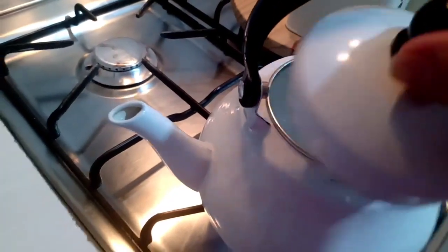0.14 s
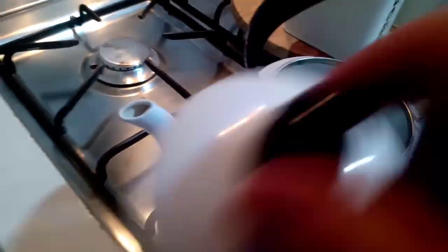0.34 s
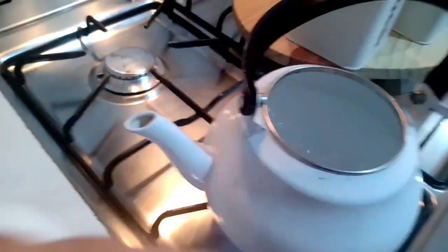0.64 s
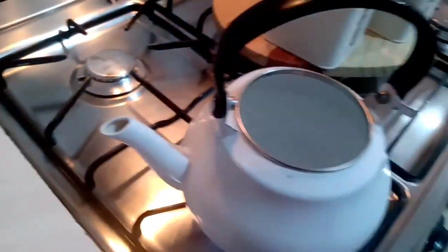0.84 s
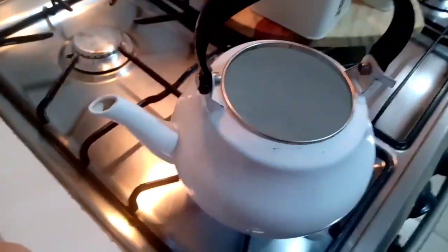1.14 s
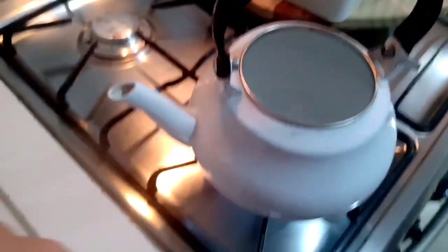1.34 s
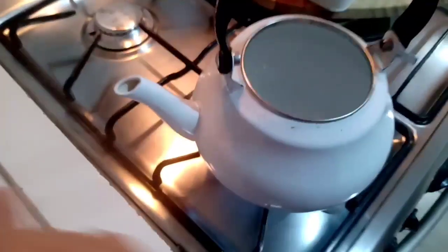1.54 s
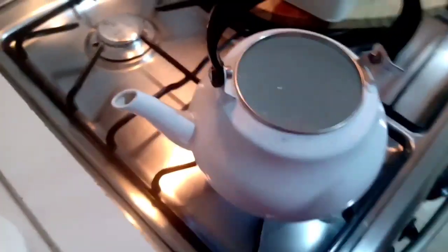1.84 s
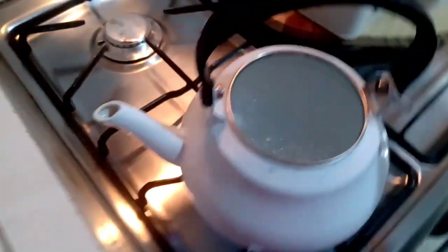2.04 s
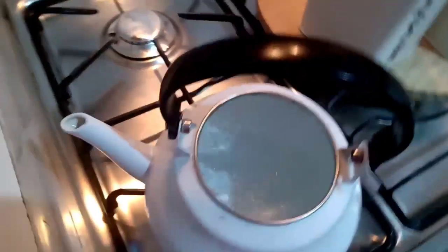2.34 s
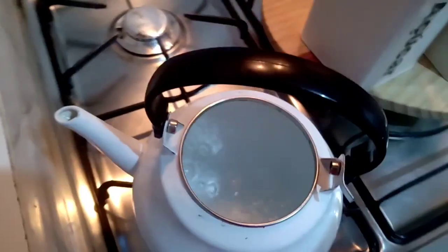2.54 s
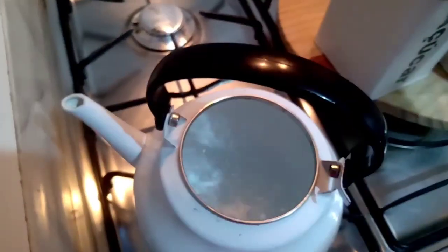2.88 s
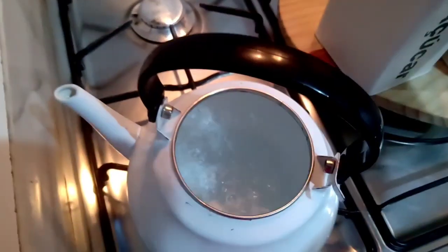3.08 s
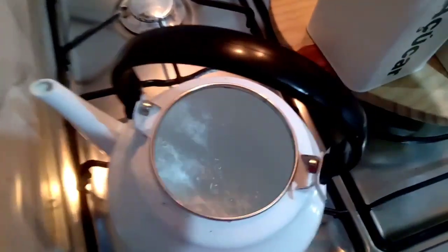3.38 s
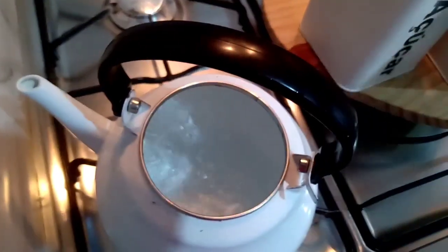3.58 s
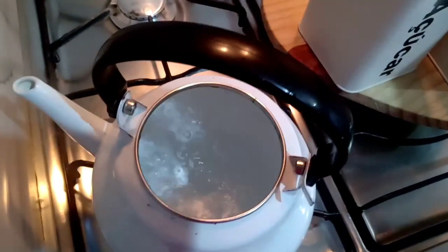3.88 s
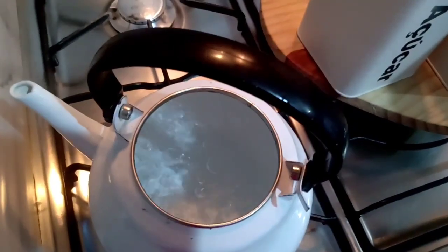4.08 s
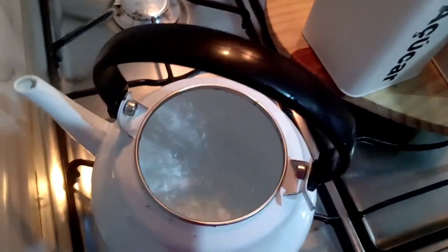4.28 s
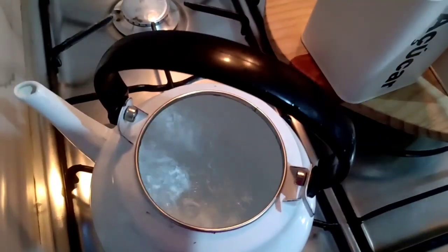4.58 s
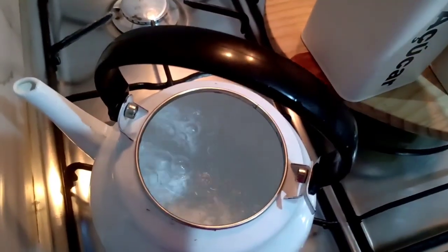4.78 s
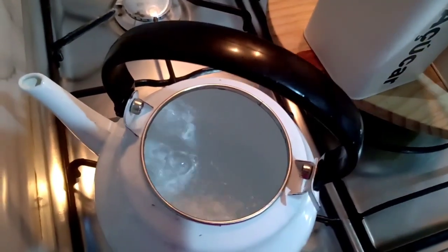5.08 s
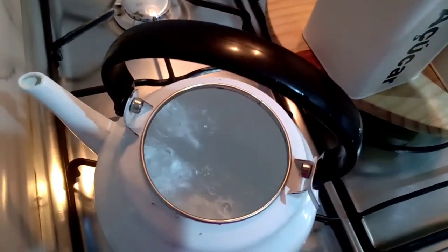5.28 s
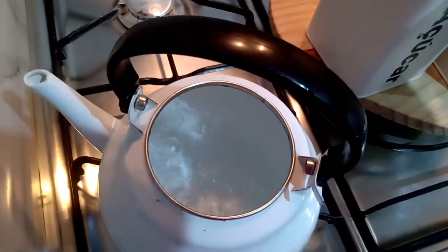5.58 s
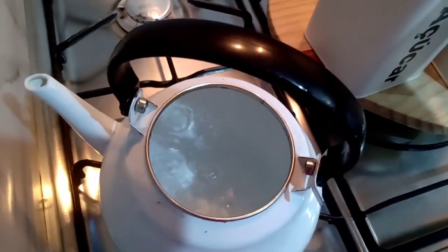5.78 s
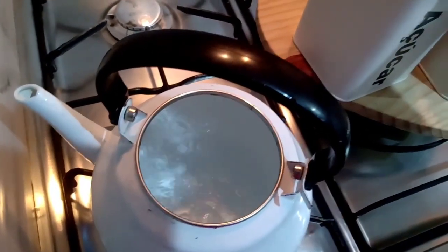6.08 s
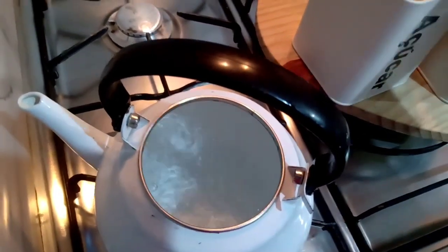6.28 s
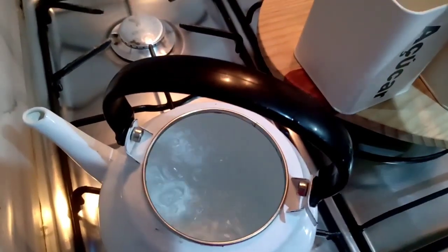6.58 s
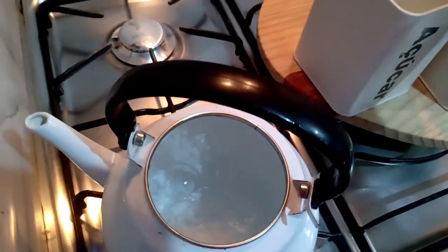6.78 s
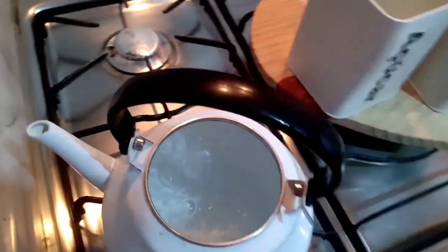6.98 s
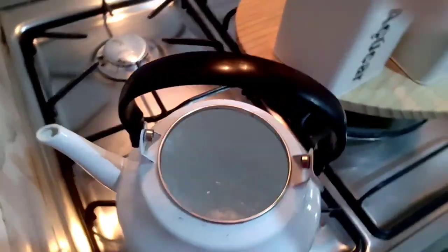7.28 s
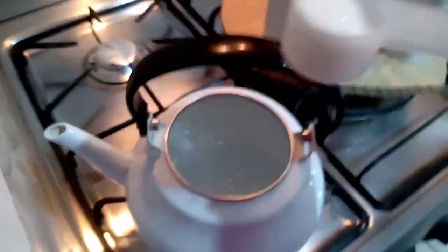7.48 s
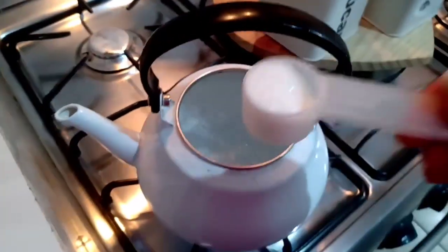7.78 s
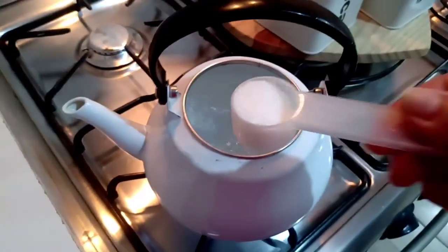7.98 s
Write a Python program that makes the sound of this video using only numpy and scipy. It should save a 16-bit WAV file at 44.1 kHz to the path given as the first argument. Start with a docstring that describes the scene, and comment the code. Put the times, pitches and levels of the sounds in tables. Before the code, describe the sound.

A small kitchen heard close up in stereo, with short room reverberation. Throughout, an open enamel kettle simmers on a gas hob: gently fluctuating low rumble, bright metallic-tinged hiss, tiny fizzing ticks and irregular hollow bubble pops. At about 1.0 s the lid touches the worktop on the right, chatters, then clinks hardest at 1.13 s with a glassy enamel click; it scrapes on its rim, with a wavering squeal around 1.3 s, and settles by 1.5 s. Simmering alone follows. Dull wooden knocks come at 2.6 s and 3.3 s, then at 4.1 s and more strongly at 4.25 s, followed by small crockery clinks at 4.3 to 4.4 s with brushing. A plastic tub clacks at 4.85 s and much louder at 5.1 s, with small aftertaps and a low cupboard boom near 5.5 s. Simmering and pops continue, with a faint swish at 7.4 s, until about 8 s.

```python
"""A small kitchen: an open enamel kettle simmers on a gas hob, close by (shaped noise, ticks, ringing pops).
Its lid is put down on the worktop to the right: it clinks, scrapes on its rim and squeals briefly,
by struck modes, stick-slip pulses through drifting resonances, and wavering tones.
Then things are fetched beside the hob: dull wooden knocks, a small clink and two sharp clacks (struck modes),
with brushing, a low cupboard boom and a faint swish made of swelling bands of noise."""
import sys
import numpy as np
from scipy import signal
from scipy.fft import rfft, irfft, next_fast_len
from scipy.io import wavfile
from scipy.ndimage import uniform_filter1d

SR = 44100
rng = np.random.default_rng(int(sys.argv[2]) if len(sys.argv) > 2 else 0)


def materialize(psi):
    """Save the field psi as 16-bit PCM at rate SR to the path in sys.argv[1].

    A 1-D psi becomes a single channel; in a 2-D psi each row is a channel.
    """
    bounded = np.clip(np.atleast_2d(psi).T, -1, 1)
    quanta = np.round(bounded * 32767).astype(np.int16)
    wavfile.write(sys.argv[1], SR, quanta)


N = 358533
TIME = np.arange(N) / SR  # s
RING = TIME[:SR // 2]  # time axis of one struck sound, s

# All levels are relative: later gains set the final balance. t60 is the time to decay by 60 dB.
# spectrum of burner and simmering water: (f/Hz, density/dB per Hz)
SIMMER_SPECTRUM = [(25, -16), (55, -45), (90, 8), (125, 4.5), (160, -4), (310, 7), (440, 4), (550, -4.5),
                   (810, 7), (1080, -7), (4000, -9.5), (10800, -11), (12200, -16.5), (15000, -21)]
# kettle resonances that colour the simmer: (f/Hz, width/Hz, left level/dB, right level/dB)
KETTLE_RESONANCES = [(1643, 52, -14, -18), (2012, 140, 5.5, 9), (2690, 60, 10, -5.5), (2700, 69, -5, 7.5),
                     (3904, 39, 12.5, 15.5), (4780, 63, 1, 7.5), (5730, 680, 1, 4), (7260, 510, 3, 2.5),
                     (8000, 350, -11, 2), (9640, 180, -3, -0.5), (10140, 490, 3, 4.5),
                     (10800, 360, -12, 4.5)]
# rise and fall of the low rumble, from the flame and from handling: (t/s, level/dB)
RUMBLE_LEVEL = [(0, 5), (1.9, -2), (2.8, 3), (3.7, -1), (5.3, 7), (6.2, -2.5), (7.3, 4), (8.1, 1)]
# left-right coherence of the simmer, clipped to 0...1 in use: (f/Hz, coherence/1)
COHERENCE = [(60, 0.55), (130, 0.68), (290, 1), (640, 0.62), (1410, 0.81), (3100, -1.16), (6820, -0.84),
             (15000, -0.36)]
# phase by which the left channel leads in the simmer: (f/Hz, phase/rad)
PHASE_LEAD = [(100, -0.75), (400, 0.37), (850, -1.56), (2000, -0.76)]
# stereo balance, left minus right: (f/Hz, level/dB)
BALANCE = [(100, -0.5), (450, 1), (800, -3), (2000, -5), (5000, -1.5), (12000, -2.5)]
# reverberation of the kitchen: (f/Hz, t60/s)
KITCHEN_DECAY = [(100, 0.96), (260, 0.9), (700, 0.43), (2000, 0.36), (5000, 0.36), (14000, 0.34)]
# single pops at set times, mostly bubbles in the kettle: (t/s, level/dB, f/Hz)
SINGLE_POPS = [(.356, -54, 780), (.387, -49, 724), (.41, -53, 700), (.4362, -48.5, 910), (.467, -52, 855),
               (.698, -51, 890), (.871, -46.5, 850), (1.88, -47, 2630), (2.744, -51, 814),
               (4.578, -48.5, 2020), (4.592, -65, 756), (5.403, -52, 1910), (5.585, -48.5, 766),
               (5.903, -45.5, 825), (6.443, -53.5, 1980), (6.654, -54, 825), (6.686, -45, 830),
               (7.182, -56, 830), (7.952, -47, 654)]

# brushing, a low cupboard boom and a faint swish, as swelling noise bands:
# (middle t/s, length/s, level/dB, centre f/Hz, width/octave)
NOISE_SWELLS = [(.02, 0.12, -55.5, 544, 0.17), (.435, 0.51, -63.5, 1120, 0.32),
                (3.144, 0.081, -53, 305, 0.68), (4.39, 0.07, -46, 1000, 0.35), (4.4, 0.087, -43, 247, 0.71),
                (4.88, 0.14, -48.5, 113, 0.7), (4.885, 0.043, -42.5, 710, 0.4),
                (5.175, 0.036, -49, 1800, 0.16), (5.27, 0.05, -53, 4400, 0.38),
                (5.46, 0.16, -50.5, 198, 1.1), (5.5, 0.17, -52.5, 85.5, 0.21),
                (7.38, 0.19, -60, 2630, 0.14)]
# modes of the wooden worktop and cupboard: (f/Hz, level/dB, t60/s)
WOOD_MODES = [(83.6, -19.5, 0.6), (110.5, -20.5, 0.34), (164.5, -19.5, 0.045), (214.4, -15, 0.39),
              (281, -9, 0.13), (323, -14, 0.43), (432.6, -9.5, 0.13), (552, -16, 0.11), (734, -11, 0.08),
              (1023, 5, 0.02), (1400, -0.5, 0.019)]
# dense wash of the struck wood: (f/Hz, density/dB per Hz)
WOOD_SPECTRUM = [(60, -27), (200, 2.5), (500, 8.5), (700, 4), (1400, 2.5), (1700, -4), (2800, -3.5),
                 (8000, -5)]
# things set down on the wood: (t/s, level/dB, hardness f/Hz, board f/Hz, settling time of the weight/s,
# level of the rumble as they drag to rest/dB)
WOOD_KNOCKS = [(2.6265, -33.5, 1700, 506, 0.0026, -53), (2.6375, -30.5, 1400, 499, 0.0016, -58),
               (2.655, -45, 800, 505, 0.0023, -67), (3.266, -47, 2000, 440, .001, -47.5),
               (3.3236, -42, 2400, 444, 0.003, -63), (3.3298, -35.5, 1500, 443, .002, -63),
               (4.084, -41.5, 1600, 447, .001, -51.5), (4.109, -42.5, 1000, 560, 0.0048, -64),
               (4.126, -48, 1600, 550, .002, -64), (4.2453, -27, 1880, 527, 0.00077, -51),
               (5.425, -50.5, 600, 324, 0.0056, -64), (5.467, -68, 700, 396, 0.0027, -62)]
# modes of a nudged piece of crockery: (f/Hz, level/dB, t60/s)
CROCKERY_MODES = [(903, 2.5, 0.2), (1167, -1, 0.074), (2975, 5, 0.091), (3150, -4, 0.05), (4170, 6, .06)]
# dense wash of the crockery: (f/Hz, density/dB per Hz)
CROCKERY_SPECTRUM = [(200, -17), (500, -3), (1400, 0), (2200, -10), (3100, 3), (4300, 2), (5500, -14),
                     (9000, -16), (13000, -11), (15000, -16)]
# nudges of the crockery: (t/s, level/dB, hardness f/Hz)
CROCKERY_NUDGES = [(4.3316, -39, 15000), (4.388, -42, 1480)]
# modes of a plastic tub put down hard: (f/Hz, level/dB, t60/s)
TUB_MODES = [(88, -26, .5), (220, -16, .12), (325, -4, .07), (415, 6, .055), (530, 5, .06), (670, 2, .06),
             (780, 2, .055), (1146, -2, .04), (1300, -6, .04), (1510, -3, .04), (1720, -4, .04),
             (1958, -4, .045), (2100, -3, .05)]
# crack and dense wash of the tub: (f/Hz, density/dB per Hz)
TUB_SPECTRUM = [(150, -24), (380, -2), (700, 2), (980, -1), (1300, -1), (1900, -1), (2500, -3.5),
                (3200, -4.5), (4400, -5), (5500, -7.5), (9000, -14.5), (15000, -26)]
# the tub meets the worktop: (t/s, level/dB, hardness f/Hz, crack against ring/dB)
TUB_CLACKS = [(4.854, -28, 8000, 2.5), (5.1085, -13.5, 12500, 1), (5.1148, -27.5, 3000, 1.5),
              (5.169, -37, 2800, 13), (5.205, -39, 3500, 12)]
# short clicks: light handling, and the sharp crack of the first clack: (t/s, level/dB, hardness f/Hz)
SHORT_CLICKS = [(2.5676, -50.5, 9000), (2.744, -56, 6000), (2.857, -57, 5940), (3.326, -49, 4030),
                (4.117, -57, 6000), (4.8535, -39.5, 15000), (5.262, -51, 6000), (5.274, -52, 6000)]

# modes of the lid: (f/Hz, level/dB, t60/s)
LID_MODES = [(826, -13, .22), (873, 0, .09), (950, -5, .07), (1017, -5, .09), (1077, -10, .17),
             (1175, -10, .06), (1287, -17, .15), (1350, -8, .07), (1640, -20, .35), (1707, -10, .1),
             (1857, -11, .1), (2223, -19, .25), (2290, -20, .12), (3120, -11, .07), (3238, 1, .06),
             (3935, -5, .08), (3995, -6, .09), (4613, -16, .07), (5502, -13, .08), (6126, -9, .15),
             (6202, 0, .15), (7919, -14, .06), (8823, 0, .16), (8890, -6, .13), (9790, 0, .15),
             (11210, -14, .16), (11970, -8, .18), (13580, -10, .14), (14480, -7, .1), (15100, -9, .13)]
# dense, quickly dying clank of the lid: (f/Hz, density/dB per Hz)
CLANK_SPECTRUM = [(100, -58), (520, -12), (720, -20), (900, 6), (1350, -11), (1700, -2), (2250, -9),
                  (2750, -24), (3250, -9), (4200, -6), (5500, -19), (7000, -17), (10000, -6), (15000, -47)]
# the rim strikes the worktop: (t/s, ring level/dB, hardness f/Hz, worktop knock level/dB)
RIM_STRIKES = [(0.973, -27.5, 4020, -17), (1.0311, -28, 2500, -20.5), (1.1274, -27, 3000, -21),
               (1.1347, -11.5, 15300, -32), (1.195, -21, 2500, -30), (1.2643, -30, 2500, -31)]
# glassy click of the enamel: (f/Hz, density/dB per Hz)
ENAMEL_SPECTRUM = [(200, -30), (650, -10), (880, 5), (1300, 10), (2000, 8), (2700, 2), (3200, 12),
                   (3550, 4), (4000, 8), (5000, 6), (6200, 9), (7300, 0), (9000, 6), (10800, -4),
                   (15000, -12)]
# knock of the worktop under the rim: (f/Hz, density/dB per Hz)
RIM_KNOCK_SPECTRUM = [(80, -60), (300, -32), (650, -18), (1050, -3), (1350, 8), (1750, -4.5), (2600, -17),
                      (4200, -40), (6000, -58), (14000, -72)]
# grit under the rim: (f/Hz, density/dB per Hz)
GRIT_SPECTRUM = [(300, -42), (700, -9), (1000, 2), (1600, -1), (2350, -3), (2750, -11), (3300, -8),
                 (4100, -16), (5000, -19), (9000, -25), (15000, -34)]
# pushes that slide the lid: (start t/s, length/s, scrape level/dB, squeal level/dB, chatter level/dB)
LID_PUSHES = [(0.973, 0.07, -27.5, -40, -22.5), (1.04, 0.05, -32, -28, -34), (1.143, 0.035, -21, -40, -36),
              (1.196, 0.052, -20, -34, -31), (1.259, 0.066, -21, -18, -36),
              (1.331, 0.032, -21.5, -15.5, -33), (1.385, 0.035, -41, -39, -56),
              (1.463, 0.022, -46, -38, -56)]
# resonances of the lid with its rim pressed on the worktop: (f/Hz, width/Hz, level/dB)
PRESSED_RESONANCES = [(915, 150, 0), (1060, 200, -5), (1370, 380, -10), (1860, 220, -17), (2300, 260, -13),
                      (3190, 220, -10), (4010, 150, -16)]
# modes that the sliding rim sets singing:
# (start t/s, length/s, f/Hz, glide/Hz per s, waver/Hz, level/dB)
SINGING_MODES = [(.976, 0.09, 1077, 0, 7, -25), (.976, 0.11, 2235, -150, 7, -28.5),
                 (.978, 0.032, 6135, 0, 12, -34.5), (1.03, 0.085, 6170, 0, 15, -41),
                 (.978, 0.025, 8810, 0, 15, -32), (.98, 0.025, 11250, 0, 15, -45),
                 (.978, 0.06, 3970, 0, 45, -39), (1.137, 0.04, 3985, -1500, 30, -28),
                 (1.195, 0.05, 3985, 0, 45, -37.5), (1.27, 0.09, 4010, 0, 55, -37),
                 (1.195, 0.03, 2030, 3000, 30, -35), (1.222, 0.022, 2230, 500, 25, -29),
                 (1.285, 0.075, 2290, 0, 30, -36), (1.28, 0.085, 2410, 1100, 30, -39),
                 (1.265, 0.098, 8900, 0, 25, -39), (1.275, 0.06, 6160, 0, 45, -41),
                 (1.345, 0.04, 6215, 0, 30, -43), (1.275, 0.1, 9800, 0, 35, -41),
                 (1.27, 0.06, 11970, 0, 30, -49)]

DRAG_LATE_S, DRAG_S, DRAG_HZ, DRAG_OCTAVES = 0.045, 0.12, 221, 0.98  # delay to middle, length, centre, width
# first gap, ratio of successive gaps, first change of level, ratio of successive hardnesses
REBOUND_S, REBOUND_SHRINK, REBOUND_DB, REBOUND_SOFTEN = 0.023, 0.337, -18.5, 0.47
BOOM_DB, BOOM_T60_S = 13.5, 0.043  # the board's main mode, whose pitch depends on where it is hit
SLIDE_ATTACK_S, SLIDE_RELEASE_S, SQUEAL_BUILD_S = 0.0047, 0.005, 0.01
SCRAPE_FADE_DB_PER_S, CHATTER_FADE_DB_PER_S, CHATTERS_PER_S = 81, 146, 120
RIM_DRIFT, RIM_DRIFT_HZ = 0.03, 25  # rms share by which pressed resonances move, and how fast
SLIP_SPREAD_DB = 4.5
SING_ATTACK_S, SING_FADE_DB_PER_S, SING_T60_S = 0.0043, 79, 0.074


def gain_of(db):
    """Logarithmic level: decibels become an amplitude ratio."""
    return 10 ** (np.asarray(db) / 20)


def evened(x):
    """Mean power: a signal is scaled to rms 1."""
    return x / np.sqrt(np.mean(x ** 2) + 1e-20)


def read(points, hz):
    """Logarithmic frequency: a spectrum table is interpolated on that axis."""
    f, value = np.transpose(points)
    return np.interp(np.log(hz + 1), np.log(f + 1), value)


def add(mix, s, sound):
    """Superposition: a sound is added to the mix from time s."""
    part = mix[..., max(round(s * SR), 0):][..., :sound.shape[-1]]
    part += sound[..., :part.shape[-1]]


def wander(size, hz):
    """Random fluctuation: noise of rms 1 with a Gaussian roll-off at hz."""
    roll_off = np.exp(-(np.fft.rfftfreq(size, 1 / SR) / hz) ** 2)
    return evened(irfft(rfft(rng.standard_normal(size)) * roll_off, size))


def coloured(x, points, size=4096):
    """Minimum phase: a causal filter gives the spectrum and keeps attacks sharp."""
    log_gain = np.log(gain_of(read(points, abs(np.fft.fftfreq(size, 1 / SR)))))
    response = np.exp(np.conj(signal.hilbert(log_gain)))
    taps = np.fft.ifft(response).real[:size // 2]
    return signal.fftconvolve(x, taps)[:len(x)]


def softened(x, hz):
    """Contact time: a soft contact lasts longer and weakens the treble above hz."""
    r = np.exp(-2 * np.pi * hz / SR)
    return signal.lfilter([(1 - r) ** 2], [1, -2 * r, r * r], x)


def burst(colour, t60):
    """High modal density: decaying noise stands for many close modes dying together."""
    return coloured(rng.standard_normal(len(RING)) * gain_of(-60 * RING / t60), colour)


def body(modes, colour, dense_db, dense_t60):
    """Modal superposition: a click excites clear decaying modes and a wash of dense ones."""
    clear = np.zeros(len(RING))
    for k, (hz, db, t60) in enumerate(modes):
        clear += (-1) ** k * gain_of(db - 60 * RING / t60) * np.sin(2 * np.pi * hz * RING)
    return evened(clear) + gain_of(dense_db) * evened(burst(colour, dense_t60))


def struck(blows, answer):
    """Impact response: each blow excites the object; its level holds for the first hundredth of a second."""
    out = np.zeros(N)
    for s, db, hard_hz, *spot in blows:
        blow = softened(answer(*spot), hard_hz)
        add(out, s, gain_of(db) * blow / np.std(blow[:SR // 100]))
    return out


def rebounds(blows, gap_s, shrink, drop_db, soften, count=3):
    """Inelastic rebound: bounces follow each blow ever sooner, weaker and softer."""
    out = []
    for s, db, hard_hz, *spot in blows:
        for k in range(count + 1):
            delay = gap_s * sum(shrink ** np.arange(k))
            out.append((s + delay, db + drop_db * np.log2(k + 1), hard_hz * soften ** k, *spot))
    return out


def resonate(x, hz, width):
    """Resonance: a band of gain 1 follows the frequency curve hz."""
    turn = np.exp(2j * np.pi * np.cumsum(hz) / SR)
    r = np.exp(-np.pi * width / SR)
    # shift the moving resonance down to zero frequency, smooth there, and shift back
    return 2 * (turn * signal.lfilter([(1 - r) ** 2], [1, -2 * r, r * r], x / turn)).real


def placed(x, left_db, left_late_ms, near_db, room_db):
    """Interaural differences and reverberation: direct sound, near echoes and the kitchen's tail."""
    hz, t, z = signal.stft(rng.standard_normal((2, SR)), SR, nperseg=256)
    same = np.exp(-(hz[:, None] / 900) ** 2)  # long waves reach both channels alike
    z[1] = same * z[0] + np.sqrt(1 - same ** 2) * z[1]
    decay = gain_of(-60 * t / read(KITCHEN_DECAY, hz)[:, None])
    tail = signal.istft(z * decay, SR, nperseg=256)[1][:, :SR]
    age = TIME[:SR]
    near = tail * np.exp(-age / 0.011) * (age > .001)
    near = near - softened(near, 710)  # small things nearby throw back little bass
    far = tail * np.clip((age - .004) / 0.018, 0, 1)
    echoes = gain_of(near_db) * near / np.linalg.norm(near[0])
    echoes += gain_of(room_db) * far / np.linalg.norm(far[0])
    left = np.interp(TIME - left_late_ms / 1000, TIME, x)
    direct = np.array([gain_of(left_db) * left, x])
    return direct + signal.fftconvolve(x[None], echoes, axes=1)[:, :N]


def simmer(level_db=-53, patchy_db=3.5, flicker_db=2.16, hiss_patchy_db=1.2, split_hz=1200, hiss_db=9.0,
           swell_db=1.49, swell_hz=2):
    """Filtered noise: a low rumble, from the flame and from handling, and the hiss of vapour bubbles."""
    frames, hz = N // 256 + 5, np.fft.rfftfreq(1024, 1 / SR)
    a, b, c, d, patches = rng.standard_normal((frames, 513, 5)).T
    patches = evened(uniform_filter1d(uniform_filter1d(patches, 10, 0), 10, 1))
    rumble_db = np.interp(np.arange(frames) * 256 / SR, *np.transpose(RUMBLE_LEVEL))
    flicker = evened(uniform_filter1d(rng.standard_normal(frames), 5))
    swell = wander(frames * 256, swell_hz)[::256]
    treble = (hz ** 2 / (hz ** 2 + split_hz ** 2))[:, None]
    colour_db = read(SIMMER_SPECTRUM, hz)
    for f, width, *channels_db in KETTLE_RESONANCES:
        colour_db = colour_db + np.outer(channels_db, 1 / (1 + (2 * (hz - f) / width) ** 2))
    same = np.clip(read(COHERENCE, hz), 0, 1)[:, None]
    left = a + 1j * b
    right = same * left + np.sqrt(1 - same ** 2) * (c + 1j * d)
    right = right * np.exp(-1j * read(PHASE_LEAD, hz))[:, None]
    low_db = rumble_db + patchy_db * patches
    high_db = hiss_db + flicker_db * flicker + hiss_patchy_db * patches
    field_db = colour_db[..., None] + (1 - treble) * low_db + treble * high_db + swell_db * swell
    sound = signal.istft(np.array([left, right]) * gain_of(field_db), nperseg=1024, noverlap=768)[1][:, :N]
    return gain_of(level_db) * evened(sound)


def fizz(level_db=-63, per_s=350, spread_db=4.0):
    """Cavitation as shot noise: tiny bubbles collapse on the hot bottom, each a tick."""
    sizes = gain_of(spread_db * np.minimum(rng.exponential(1, N), 5)) * rng.choice([-1, 1], N)
    ticks = coloured(sizes * (rng.random(N) < per_s / SR), SIMMER_SPECTRUM)
    return placed(gain_of(level_db) * evened(ticks), left_db=-3.0, left_late_ms=0.58, near_db=-0.5, room_db=-2.5)


def pops(t60=0.035, splash_db=-5, random_db=-55.5, spread_db=-13.0, low_hz=770, high_hz=2000,
         high_share=.15, scatter=0.042, count=50):
    """Cavity resonance: pops, mostly bubbles ringing the air in the kettle, at set and at random times."""
    bursts = list(SINGLE_POPS)
    for u, v, w, pick in rng.random((count, 4)):
        hz = (high_hz if pick < high_share else low_hz) * (1 + scatter * (2 * w - 1))
        bursts.append((u * N / SR, random_db + spread_db * (2 * v - 1), hz))
    out = np.zeros(N)
    for s, db, hz in bursts:
        pop = body([(hz, 0, t60)], SIMMER_SPECTRUM, splash_db, dense_t60=0.028)
        add(out, s, gain_of(db) * pop / np.std(pop[:SR // 100]))
    return placed(out, left_db=-3.5, left_late_ms=0.15, near_db=-30.0, room_db=-28)


def noise_swells(grain_db=-1.5):
    """Band-limited noise: uneven swells of brushing, a low boom and a swish; a low one follows each knock."""
    out, hz = np.zeros(N), np.fft.rfftfreq(len(RING), 1 / SR)
    middle = RING.mean()
    drags = [(s + DRAG_LATE_S, DRAG_S, db, DRAG_HZ, DRAG_OCTAVES) for s, *_, db in WOOD_KNOCKS]
    for s, length, db, centre_hz, octaves in list(NOISE_SWELLS) + drags:
        band = np.exp(-.5 * (np.log2((hz + 1) / centre_hz) / octaves) ** 2)
        noise = irfft(rfft(rng.standard_normal(len(RING))) * band, len(RING))
        noise = evened(noise * gain_of(grain_db * wander(len(RING), 120)))
        swell = gain_of(db) * noise * np.exp(-(2 * (RING - middle) / length) ** 2)
        add(out, s - middle, swell[max(round((middle - s) * SR), 0):])  # trim what precedes the start
    return placed(out, left_db=-1.5, left_late_ms=0, near_db=-8, room_db=-18.5)


def wood_answer(boom_hz, settle_s):
    """Plate vibration: the board's modes swell in as the weight settles, then decay."""
    modes = list(WOOD_MODES) + [(boom_hz, BOOM_DB, BOOM_T60_S)]
    return (1 - np.exp(-RING / settle_s)) * body(modes, WOOD_SPECTRUM, dense_db=-2.5, dense_t60=0.038)


def worktop():
    """Impact excitation: dull knocks on wood, with rebounds, and nudges against crockery."""
    first_blows = [row[:5] for row in WOOD_KNOCKS]
    blows = rebounds(first_blows, REBOUND_S, REBOUND_SHRINK, REBOUND_DB, REBOUND_SOFTEN)
    knocks = struck(blows, wood_answer)
    clinks = struck(CROCKERY_NUDGES,
                    lambda: body(CROCKERY_MODES, CROCKERY_SPECTRUM, dense_db=-2.0, dense_t60=0.14))
    return placed(knocks + clinks, left_db=0.0, left_late_ms=-0.098, near_db=-9.0, room_db=-14.0)


def tub(snap_db=-7):
    """Shell vibration: a plastic tub clacks down with a sharp snap, amid short clicks."""
    snap = gain_of(snap_db) * evened(coloured(1.0 * (RING == 0), TUB_SPECTRUM))

    def clack(crack_db):
        """Modes and crack together: the ring carries a dense wash and the snap."""
        return body(TUB_MODES, TUB_SPECTRUM, dense_db=crack_db, dense_t60=0.023) + gain_of(crack_db) * snap

    clacks = struck(TUB_CLACKS, clack)
    clicks = struck(SHORT_CLICKS, lambda: burst(TUB_SPECTRUM, t60=0.0022))
    return placed(gain_of(-6.0) * clacks + clicks, left_db=2.5, left_late_ms=-0.11, near_db=0.5, room_db=-10.0)


def pushes(t):
    """Sliding friction: in each push scrape and chatter fade while the squeal builds up."""
    scrape, squeal, chatter = np.zeros((3, len(t)))
    for start, length, scrape_db, squeal_db, chatter_db in LID_PUSHES:
        age = np.maximum(t - start, 0)
        release = np.exp(-np.maximum(age - length, 0) / SLIDE_RELEASE_S)
        moving = np.minimum(age / SLIDE_ATTACK_S, 1) * release
        scrape += moving * gain_of(scrape_db - SCRAPE_FADE_DB_PER_S * age)
        squeal += moving * gain_of(squeal_db) * (1 - np.exp(-age / SQUEAL_BUILD_S))
        chatter += moving * gain_of(chatter_db - CHATTER_FADE_DB_PER_S * age)
    return scrape, squeal, chatter


def lid_slide(catches_per_s=300, scrape_hz=7000, detune=0.00807, ring_db=-7, slips_per_s=900, rasp_db=-8,
              grit_db=3, squeal_hz=826, waver=0.0077, shimmer_db=0.5, octave_db=-27, uneven=0.47):
    """Stick-slip: catches and slips ring moving resonances; a wavering tone squeals at the lid's lowest mode."""
    t = LID_PUSHES[0][0] + TIME[:SR * 3 // 5]
    size = len(t)
    scrape_gain, squeal_gain, chatter_gain = pushes(t)
    catches = rng.uniform(0.23, 1, size) * (rng.random(size) < catches_per_s / SR)
    lid_ring = body(LID_MODES, CLANK_SPECTRUM, dense_db=0.0, dense_t60=0.05)
    ringing = softened(signal.fftconvolve(catches, lid_ring)[:size], scrape_hz)
    # the travelling contact point detunes the modes a little
    ringing = np.interp(t + detune * np.cumsum(wander(size, 50)) / SR, t, ringing)
    phase = 2 * np.pi * np.cumsum(squeal_hz * (1 + waver * wander(size, 172))) / SR
    # small slips of uneven size strike the damped, drifting resonances
    slip_sizes = gain_of(SLIP_SPREAD_DB * np.minimum(rng.exponential(1, size), 2)) * rng.choice([-1, 1], size)
    slips = slip_sizes * (rng.random(size) < slips_per_s / SR)
    grind = np.zeros(size)
    for k, (hz, width, db) in enumerate(PRESSED_RESONANCES):
        drifting_hz = hz * (1 + RIM_DRIFT * wander(size, RIM_DRIFT_HZ))
        grind += (-1) ** k * gain_of(db) * resonate(slips, drifting_hz, width)
    # grit crunches once in each cycle of the squeal
    grit = rng.standard_normal(size) * (1 + np.cos(phase)) * gain_of(grit_db * wander(size, 300))
    rasp = coloured(grit, GRIT_SPECTRUM)
    scrape = evened(evened(grind) + gain_of(ring_db) * evened(ringing) + gain_of(rasp_db) * evened(rasp))
    squeal = evened(np.sin(phase) + gain_of(octave_db) * np.sin(2 * phase))
    squeal = squeal * gain_of(shimmer_db * wander(size, 114))
    # the rim hops unevenly and knocks on the worktop
    hop_rate = CHATTERS_PER_S * np.exp(uneven * wander(size, 79.4))
    hops = np.diff(np.floor(np.cumsum(hop_rate) / SR), prepend=0)
    chatter = evened(signal.fftconvolve(hops, burst(RIM_KNOCK_SPECTRUM, t60=0.0052))[:size])
    return t[0], scrape_gain * scrape + squeal_gain * squeal + chatter_gain * chatter


def lid_sing(start, length, hz, glide_hz_per_s, waver_hz, db, shimmer_db=5.0):
    """Friction-driven vibration: one mode sings unsteadily for a moment, then rings out."""
    pitch_hz = hz + glide_hz_per_s * np.minimum(RING, length) + waver_hz * wander(len(RING), 90)
    phase = 2 * np.pi * np.cumsum(pitch_hz) / SR
    fade_db = SING_FADE_DB_PER_S * RING + 60 * np.maximum(RING - length, 0) / SING_T60_S
    level = gain_of(db - fade_db + shimmer_db * wander(len(RING), 57))
    return start, np.minimum(RING / SING_ATTACK_S, 1) * level * evened(np.sin(phase))


def lid(crack_db=-4.0):
    """Impact and friction: the lid lands on its rim, chatters and slides to rest."""
    out = struck([row[:3] for row in RIM_STRIKES],
                 lambda: body(LID_MODES, CLANK_SPECTRUM, dense_db=-2.0, dense_t60=0.011))
    # only the strongest landing makes the glassy enamel click
    s, db, hard_hz, _ = max(RIM_STRIKES, key=lambda row: row[1])
    out += struck([(s, db + crack_db, hard_hz)], lambda: burst(ENAMEL_SPECTRUM, t60=0.011))
    # the worktop knocks back at every strike
    knocks = [(s, knock_db, 9000) for s, _, _, knock_db in RIM_STRIKES]
    out += struck(knocks, lambda: burst(RIM_KNOCK_SPECTRUM, t60=0.003))
    add(out, *lid_slide())
    for row in SINGING_MODES:
        add(out, *lid_sing(*row))
    return placed(gain_of(-6.5) * out, left_db=-7, left_late_ms=0.339, near_db=-6.0, room_db=-19.0)


def scene():
    """Superposition: everything heard at the hob, from the background to the lid."""
    return simmer() + fizz() + pops() + noise_swells() + worktop() + tub() + lid()


def record(dry, low_cut_hz=52, high_cut_hz=15550):
    """Linear filtering: the channels are balanced by frequency, then deep bass and top treble are cut."""
    size = next_fast_len(N + SR // 10)
    balance_db = read(BALANCE, np.fft.rfftfreq(size, 1 / SR))
    channel_gains = gain_of(np.array([balance_db, -balance_db]) / 2)
    heard = irfft(rfft(dry, size) * channel_gains, size)[:, :N]
    heard = signal.sosfilt(signal.butter(2, low_cut_hz, "highpass", fs=SR, output="sos"), heard)
    low_pass = signal.firwin(511, high_cut_hz, window=("kaiser", 9), fs=SR)
    return signal.oaconvolve(heard, low_pass[None], "same")


dry = scene()
out = record(dry)
materialize(out)
```